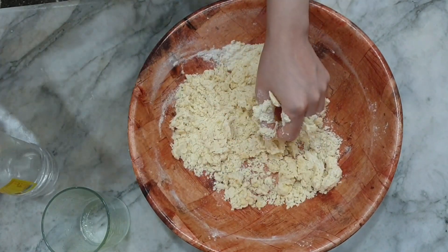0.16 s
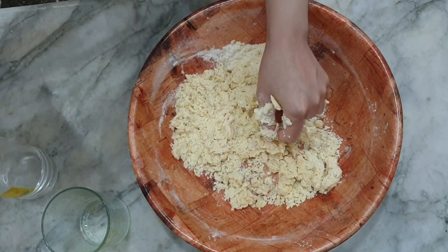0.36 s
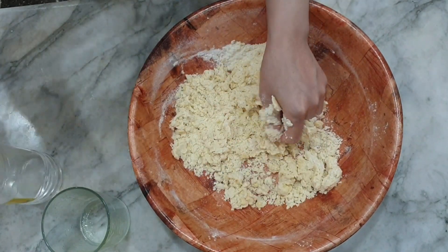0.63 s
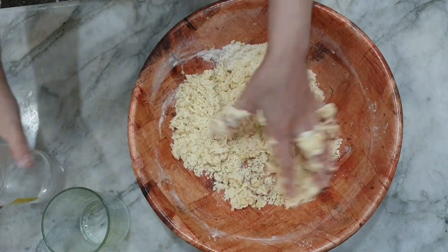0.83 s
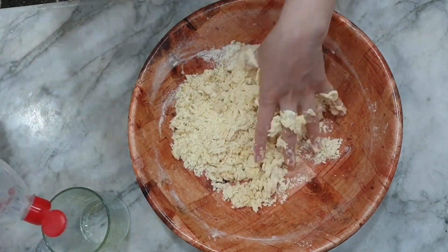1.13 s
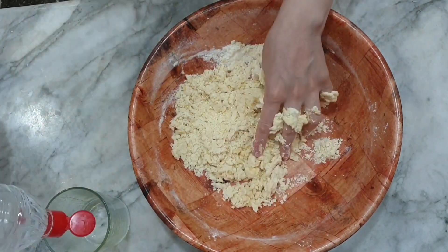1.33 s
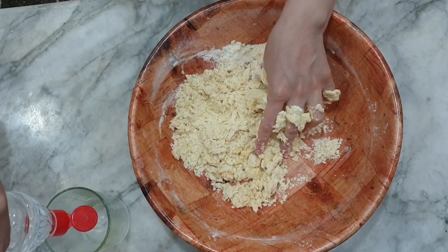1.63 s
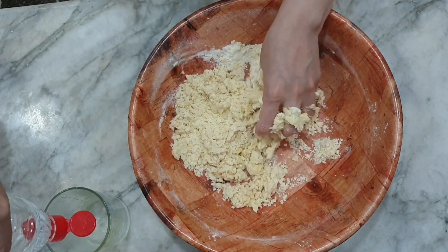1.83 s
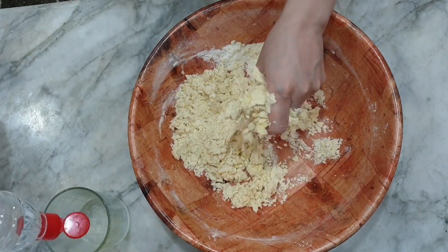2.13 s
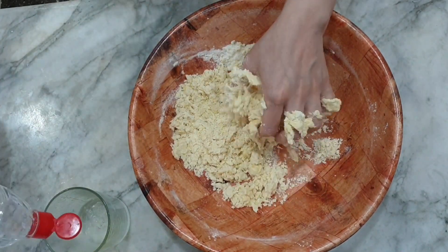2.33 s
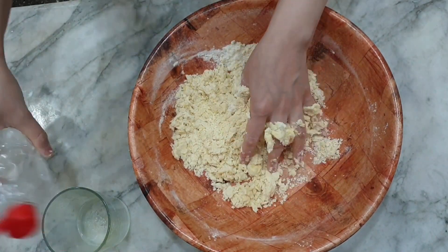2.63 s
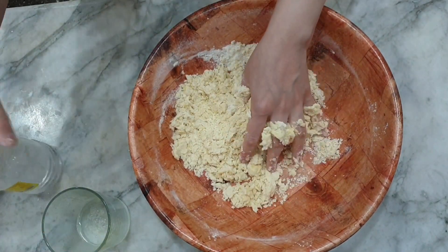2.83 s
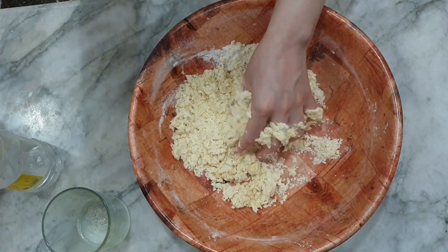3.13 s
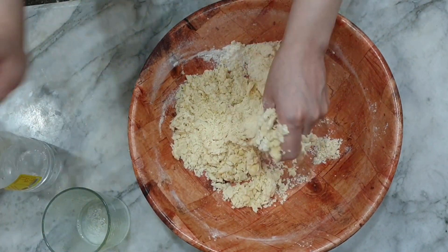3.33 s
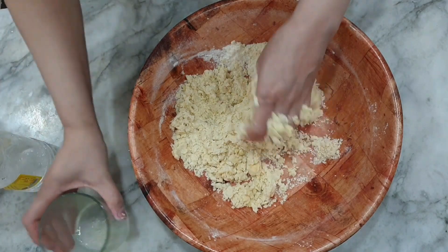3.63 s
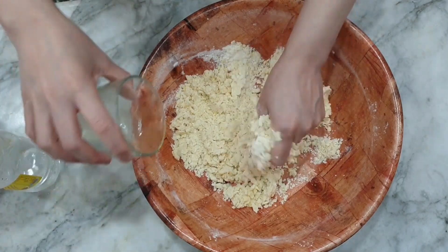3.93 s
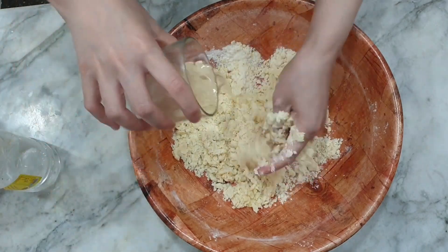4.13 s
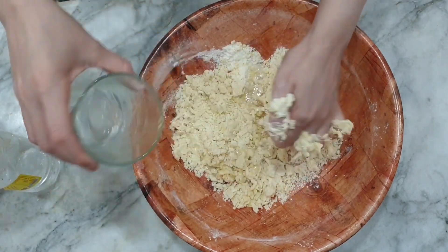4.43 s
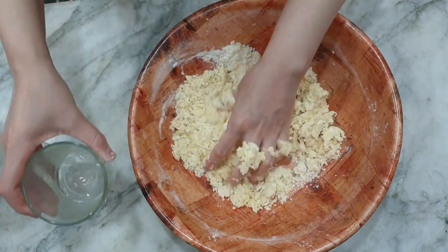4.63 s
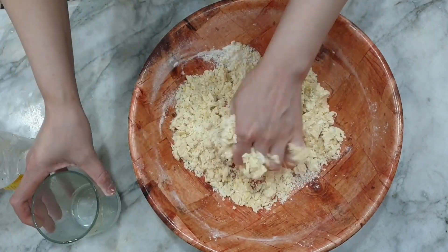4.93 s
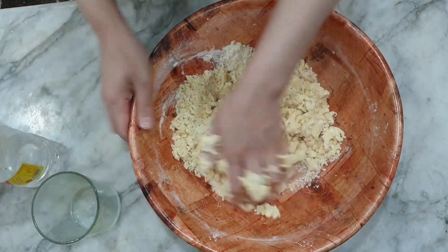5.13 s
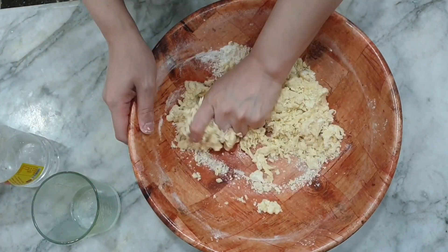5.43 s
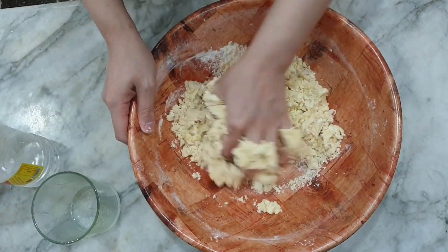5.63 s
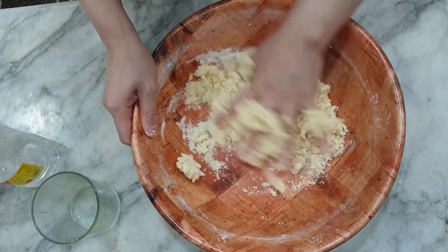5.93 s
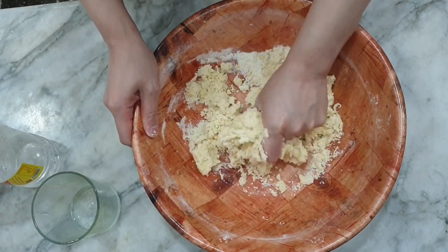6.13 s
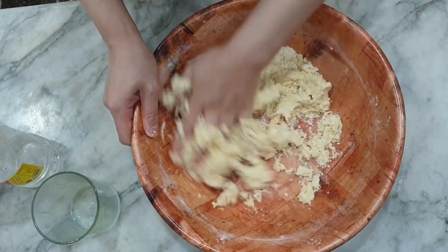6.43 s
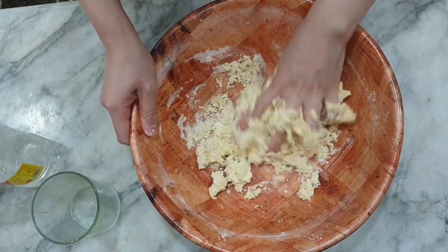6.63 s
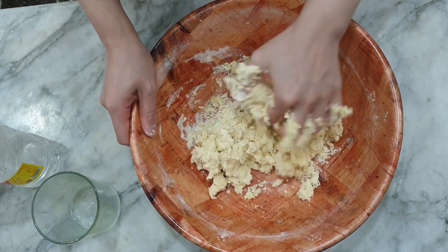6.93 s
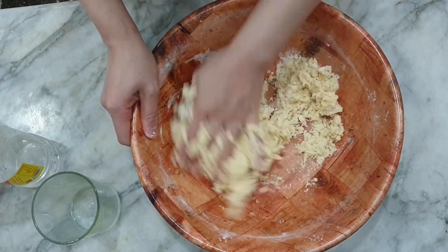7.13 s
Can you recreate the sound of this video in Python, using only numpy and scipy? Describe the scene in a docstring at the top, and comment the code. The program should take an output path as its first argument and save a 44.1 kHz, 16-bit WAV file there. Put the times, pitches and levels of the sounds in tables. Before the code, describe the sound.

Soft, gritty rustling of dough being mixed by hand, with hollow bowl knocks, a bottle cap clicking twice and a brief oil gurgle.

```python
"""Working crumbly dough in a bowl

Crumbs and skin rub a wide bowl on a stone counter; finger knocks ring its modes. A plastic bottle cap
snaps twice, oil gurgles in the neck, and the bottle's base judders on the stone. Liquid, bottle and glass
give short ringing notes and tiny high ticks. A hard kitchen rings after each blow, over a low rumble.
Heard by a phone above the bowl."""
import sys
import numpy as np
from scipy import signal
from scipy.fft import rfft, irfft
from scipy.io import wavfile
from scipy.ndimage import uniform_filter1d

SR = 44100
rng = np.random.default_rng(int(sys.argv[2]) if len(sys.argv) > 2 else 0)


def generate_wav(sig):
    """Save sig (samples, or channels by samples) to the path in sys.argv[1] as 16-bit PCM at SR."""
    pcm = np.round(np.clip(np.atleast_2d(sig).T, -1, 1) * 32767).astype(np.int16)
    wavfile.write(sys.argv[1], SR, pcm)


N = 320607
T = np.arange(N) / SR

# hand, dough and bottle strokes: (time [s], hold [s], scrape [dB], rustle re scrape [dB],
# bowl pressure re scrape [dB])
STROKES = [(-0.01, 0.25, -82, -14, -9), (0.528, 0.02, -56, -34, 7.5), (0.642, 0.03, -62.5, -23, -4),
           (0.709, 0.037, -67, -17, 8), (0.832, 0.068, -65.5, -1, 5.5), (0.975, 0.077, -70.5, 1, 6),
           (1.135, 0.093, -66, 0, 7), (1.266, 0.032, -65, -3.5, 10), (1.616, 0.089, -95, 15.5, 27),
           (1.765, 0.42, -65.5, -0.5, -19), (2.353, 0.0087, -68.5, -6, -16), (2.398, 0.013, -67, -8, -22),
           (2.55, 0.078, -76, -3.5, 16), (2.871, 0.02, -63, -12.5, 16), (3.129, 0.0064, -57, -10, 0),
           (3.328, 0.35, -88, -8, 22), (3.742, 0.017, -76, -7.5, 13), (3.77, 0.075, -66.5, 5.5, 4),
           (4.096, 0.16, -85, -1.5, 20), (4.225, 0.22, -89, 4, 21), (4.649, 0.052, -65, -1, 10.5),
           (4.692, 0.02, -59, -0.5, 0), (4.753, 0.0013, -52, 0.5, 2.5), (4.926, 0.045, -73.5, -1, 8),
           (5.043, 0.21, -83, 5.5, 19.5), (5.145, 0.062, -69, 5, -5), (5.192, 0.01, -49, -3, -7.5),
           (5.232, 0.21, -65.5, -2.5, -2), (5.504, 0.26, -86.5, 5.5, 14), (5.666, 0.075, -66.5, -3, 5),
           (5.796, 0.14, -62, 3, 1.5), (5.969, 0.088, -60, -1.5, 7), (6.23, 0.043, -70, -11.5, 7.5),
           (6.324, 0.13, -72.5, -0.5, 7.5), (6.417, 0.23, -61.5, -0.5, -2.5), (6.682, 0.039, -55, -8, -4),
           (6.843, 0.12, -86, -1.5, 9.5), (7.081, 0.57, -63.5, -1, -4)]
# crumb spectrum: (frequency [Hz], gain [dB])
CRUMB_SPECTRUM = [(530, -53.5), (900, 19.5), (1220, -4), (1370, -15), (1490, -13), (2360, -9.5),
                  (4900, -5.5), (5320, -8.5), (8630, -11), (11600, -1), (14500, -2.5), (15200, -23.5)]
# knocks on bowl and counter: (time [s], ring peak [dB], tick re ring [dB], favoured ring [Hz], thud [Hz])
KNOCKS = [(0.531, -42.5, -22, 890, 209), (0.538, -41, -13, 704, 214), (0.547, -37, -9, 810, 232),
          (0.572, -46.5, -20, 704, 239), (0.649, -51, -6, 666, 113), (0.685, -49.5, -4, 465, 324),
          (0.735, -48.5, -6, 410, 191), (0.866, -39, -23, 940, 207), (1.146, -58, 9, 525, 331),
          (1.171, -39, -2, 890, 345), (1.507, -48.5, -47, 790, 113), (1.98, -44.5, -15, 550, 130),
          (2.228, -48.5, -2.5, 900, 124.2), (2.372, -50.5, -22, 410, 438.7), (2.389, -58, -10, 430, 320),
          (2.567, -47.5, -26, 580, 199), (2.622, -47.5, -27, 396, 348), (3.134, -30, -4, 603, 160),
          (3.137, -31.5, -6.5, 221, 157.5), (3.32, -51.5, -18, 502, 204.6), (3.352, -48, -17, 459, 139),
          (3.639, -51, -33.5, 694, 121), (3.768, -48.5, -27, 830, 161), (3.782, -46.5, -15, 503, 200),
          (4.653, -53, -9, 500, 140), (4.734, -46.5, -10, 437, 314), (4.758, -36.5, 4, 1440, 145),
          (4.765, -52.5, 20, 1010, 287), (4.774, -44.5, -6, 695, 308), (4.955, -38.5, -10.5, 970, 187),
          (5.025, -45, -15, 866, 191), (5.198, -42, 7, 685, 119), (5.686, -50.5, 8.5, 860, 126),
          (5.728, -41, -7, 620, 230), (5.746, -46, -19, 640, 139), (5.982, -41, -10, 750, 310),
          (5.9875, -29, -4, 660, 301), (5.995, -39, 4, 646, 280), (6.262, -45.5, -16, 710, 131),
          (6.394, -47.5, -4, 423, 230), (6.632, -51, -20, 435, 332), (6.644, -47, -22, 506, 320),
          (6.652, -60, -22, 450, 345), (6.896, -53, -15, 580, 152), (7.083, -36, 0, 1270, 316),
          (7.088, -38, -14, 396, 298), (7.129, -49, -16, 392, 214)]
# bowl, hollow bottle and hinged lid modes: (frequency [Hz], gain [dB], t60 [s])
BOWL_MODES = [(199, 2.5, 0.092), (328, -1, 0.081), (423, -5.5, 0.062), (526, -3, 0.049), (625, -4.5, 0.069),
              (706, -8, 0.058), (820, -2.5, 0.026), (946, -4, 0.026), (1195, -1.5, 0.0093),
              (1480, -3, 0.019), (1875, 8.5, 0.0053), (2580, -2.5, 0.025)]
BOTTLE_MODES = [(161, 7, 0.029), (315, -8.5, 0.12), (418, 0, 0.038), (598, -7, 0.14), (604, 4.5, 0.057),
                (727, 4, 0.034), (765, -7.5, 0.032), (1052, -3.5, 0.045)]
LID_MODES = [(1582, 2.5, 0.054), (2563, 3.5, 0.04), (3763, 3, 0.027)]
# cap snaps: (time [s], crack peak [dB], bottle re crack [dB], treble tilt [dB/oct], left - right [dB])
SNAPS = [(1.732, -18, -8, -1, 12), (2.6822, -23.5, -20.5, -1, -18)]
# plastic crack spectrum: (frequency [Hz], gain [dB])
CRACK_SPECTRUM = [(290, -46), (500, 0), (1530, 4.5), (2800, 0.5), (3620, -6), (5190, -3), (11400, -3.5),
                  (14400, -13.5), (15400, -68.5)]
# bottle base on stone: (time [s], length [s], slip rate [Hz], level [dB])
JUDDERS = [(2.817, 0.028, 205, -41), (2.87, 0.056, 207, -38.5)]
# oil in the bottle neck: (time [s], bubble rate [1/s], base level [dB])
GURGLE = [(1.861, 222, -55), (2.151, 240, -57), (2.236, 150, -60), (2.27, 45, -72)]
# notes and ticks of liquid, bottle and glass: (time [s], length [s], pitch [Hz], level [dB])
NOTES_AND_TICKS = [(1.95, 0.06, 2640, -55), (1.989, 0.002, 10500, -56), (2.087, 0.043, 921, -53),
                   (2.106, 0.0006, 12800, -42), (2.133, 0.002, 9300, -54), (2.155, 0.024, 4320, -64),
                   (2.167, 0.001, 13800, -54), (2.18, 0.001, 6000, -58), (2.196, 0.011, 914, -52.5),
                   (2.197, 0.0094, 1137, -49), (2.198, 0.012, 1460, -51), (2.22, 0.011, 903, -52.5),
                   (2.36, 0.026, 2900, -62), (2.413, 0.0057, 2597, -51), (2.447, 0.032, 1830, -63),
                   (3.97, 0.05, 1493, -71), (4.35, 0.003, 8000, -67), (4.359, .06, 1666, -69),
                   (4.386, 0.0005, 4200, -65), (4.387, 0.0004, 6200, -70)]
# household rumble: (time [s], level near 65 Hz [dB], level near 120 Hz [dB])
RUMBLE = [(0, -67, -71.5), (.65, -63, -58), (1.36, -60, -66.5), (1.9, -65, -67.5), (2.5, -68, -64.5),
          (2.9, -65, -56), (3.352, -72.5, -65), (3.999, -60.5, -67), (4.248, -68.5, -68.5),
          (5.28, -59.5, -61), (5.67, -67.5, -63.5), (6.3, -56, -61.5), (6.6, -64.5, -61.5),
          (6.85, -50, -61.5), (7.27, -60.5, -61.5)]
# household air spectrum: (frequency [Hz], gain [dB])
AIR_SPECTRUM = [(13, -38.5), (22, -1), (59, -7), (96, -9), (130, -2.5), (153, -28.5), (206, -11),
                (397, -22), (431, -25), (468, -21), (1690, -40.5), (2100, -50), (3000, -51), (5000, -57.5),
                (8000, -63), (15000, -54.5)]
# faint mid hiss: (time [s], level [dB])
HISS = [(0, -83), (1.3, -93.5), (1.9, -68), (2.4, -81), (2.9, -73.5), (4.8, -72.5), (7.27, -76.5)]
# kitchen decay: (frequency [Hz], t60 [s])
KITCHEN_DECAY = [(150, 0.36), (500, 0.21), (1500, 0.31), (4000, 0.31), (9000, 0.099), (14000, 0.36)]
# microphone port imbalance: (frequency [Hz], left - right [dB])
PORT_BALANCE = [(60, 2), (400, -1), (1300, -3), (2500, -3.5), (5000, -8), (12000, -7)]

FADES_S = (0.25, 0.29, 0.31)  # rustle, scrape, bowl pressure
RISE_S, RISE_AT_DB, RISE_HALVING_DB = 0.017, -65.5, 20.5  # stronger strokes swell faster
MIDDLE_HZ, THUD_DB, THUD_LOSS_DB_PER_OCT = 430, 1.5, 7  # mid-bowl: low, heavy; rim: high, little thud
TICK_TOP_HZ, TICK_DB_PER_OCT = 5700, 13  # harder contacts tick brighter
KNOCK_PAN_DB, LID_DB, AIR_DB = 6.5, -14, -62
FLURRY_DELAYS_S, FLURRY_GAIN = (0.00018, 0.0005, 0.00089), 0.47
JUDDER_EDGE_S, JUDDER_DB_PER_OCT, JUDDER_WAVER = 0.0045, -15, 0.03
SPRAY_SHARE, SPRAY_LO_HZ, SPRAY_HI_HZ, SPRAY_DB = 0.3, 4180, 13500, -7.5
BOWL_LAG_S, BOTTLE_LAG_S = 0.0001, -0.00021  # bowl sounds reach the left port later, bottle sounds the right
BOTTOM_HZ, TOP_HZ = 40, 14900


def rubbing():
    """Crumbs slip as tiny clicks, unrelated at the two ports; coarse slips shake the bowl's modes."""
    db, fine_db, press_db = np.transpose(STROKES)[2:]
    rustle, scrape, press = map(stroke_envelope, (db + fine_db, db, db + press_db), FADES_S)
    slips = rng.standard_normal((3, N)) * undb(1.5 * rng.exponential(size=(3, N)))
    crumbs = colour(slips[:2], CRUMB_SPECTRUM) * undb(1.3 * walk(40))  # the grip stutters
    fine = unit(colour(band(crumbs, 5400, 18000), [(7000, 13.3), (13000, 2.3)])) * undb(0.38 * walk(41))
    coarse = unit(band(crumbs, 1450, 2417, order=3)) * undb(0.84 * walk(30))
    lumps = undb(-4.5) * unit(band(slips[:2], 720, 1500))
    between = 1.04 * np.sqrt(rustle * scrape) * unit(band(crumbs, 2795, 4210, order=3))
    bowl = unit(band(ring(slips[2] * undb(3.2 * walk(40)), BOWL_MODES), 250, 1400))
    friction = rustle * fine + between + scrape * (coarse + lumps)
    return np.sqrt(2) * friction + ports(press * bowl, BOWL_LAG_S)


def stroke_envelope(levels_db, fade_s):
    """Each stroke rises, holds and fades; overlaps add in power."""
    power = 0
    for (start_s, hold_s, force_db, *_), db in zip(STROKES, levels_db):
        rise_s = RISE_S * 2 ** ((RISE_AT_DB - force_db) / RISE_HALVING_DB)
        full_s = start_s + rise_s
        corners_s = [start_s - rise_s, full_s, full_s + hold_s, full_s + hold_s + fade_s]
        shape_db = np.interp(T, corners_s, [-33, -2, -4, -62.5], left=-200, right=-200)
        power += undb(db + shape_db) ** 2
    return np.sqrt(power)


def knocks():
    """A push with small bounces rings the bowl; nails add a tick, the blow's weight a dull thud."""
    out, t = np.zeros((2, N)), T[:int(0.25 * SR)]
    pans_db = KNOCK_PAN_DB * rng.standard_normal(len(KNOCKS))
    for (start_s, db, tick_db, spot_hz, thud_hz), pan_db in zip(KNOCKS, pans_db):
        noise = rng.standard_normal((2, len(t)))
        push = 5.74 * (t == 0) + noise[0] * np.exp(-t / 0.0066)
        click = 6 * (t == 0) + noise[1] * np.exp(-t / 0.0025)
        # each spot favours the modes near one pitch
        modes = [(hz, gain_db - 8.5 * abs(np.log2(hz / spot_hz)), t60_s)
                 for hz, gain_db, t60_s in BOWL_MODES]
        body = ring(band(push, 120, 2.77 * spot_hz), modes)
        tick_top_hz = max(TICK_TOP_HZ * 2 ** (tick_db / TICK_DB_PER_OCT), 3000)
        tick = band(band(click, 900, 4500, order=1), 1200, tick_top_hz)
        thud_db = THUD_DB - THUD_LOSS_DB_PER_OCT * np.log2(spot_hz / MIDDLE_HZ)
        thud = np.sin(2 * np.pi * thud_hz * t) * np.exp(-t * thud_hz / 1.42) * (1 - np.exp(-t / 0.0026))
        contact = peak(body, db) + peak(tick, db + tick_db)
        add(out, start_s, ports(contact, BOWL_LAG_S, pan_db) + peak(thud, db + thud_db))
    return out


def cap_snaps():
    """A sharp plastic crack; lid and hollow bottle ring under it."""
    out, t = np.zeros((2, N)), T[:int(0.4 * SR)]
    blow = signal.unit_impulse(len(t), 30)
    release = flurry(blow)
    for start_s, db, bottle_db, tilt_db_per_oct, pan_db in SNAPS:
        spectrum = [(hz, gain_db + tilt_db_per_oct * max(np.log2(hz / 1500), 0))
                    for hz, gain_db in CRACK_SPECTRUM]
        crack = peak(colour(release, spectrum) * (t < 0.2), db)
        bottle = peak(ring(blow, BOTTLE_MODES), db + bottle_db)
        lid = peak(ring(release, LID_MODES), db + LID_DB)
        add(out, start_s, ports(crack + bottle + lid, BOTTLE_LAG_S, pan_db))
    return out


def flurry(x):
    """The catch lets go: all-pass echoes spread a click over a few milliseconds."""
    for delay_s in FLURRY_DELAYS_S:
        feedback = np.r_[1, np.zeros(int(delay_s * SR)), -FLURRY_GAIN]
        x = signal.lfilter(feedback[::-1], feedback, x)
    return x


def bottle_judders():
    """The base sticks and slips at a nearly even rate: a low buzz with a few overtones."""
    out = np.zeros((2, N))
    for start_s, length_s, hz, db in JUDDERS:
        t = T[:int(2 * length_s * SR)]
        shape = np.minimum(t / JUDDER_EDGE_S, 1) * np.exp(-np.maximum(t - length_s, 0) / JUDDER_EDGE_S)
        rate_waver, level_waver = unit(band(rng.standard_normal((2, len(t))), 12, 90, order=1))
        phase = 2 * np.pi * np.cumsum(hz * (1 + JUDDER_WAVER * rate_waver)) / SR
        buzz = sum(undb(JUDDER_DB_PER_OCT * np.log2(k)) * np.sin(k * phase) for k in range(1, 7))
        add(out, start_s, ports(undb(db + 2.75 * level_waver) * shape * buzz, BOTTLE_LAG_S))
    return out


def oil_gurgle():
    """Bubbles ring at random moments, gliding upward; the smallest burst as a spray of high ticks."""
    out, t = np.zeros((2, N)), T[:int(0.04 * SR)]
    times_s, rates_hz, levels_db = np.transpose(GURGLE)
    now_s = times_s[0]
    for wait, pitch, size, kind in rng.random((200, 4)):
        now_s -= np.log(1 - wait) / np.interp(now_s, times_s, rates_hz)
        if now_s < times_s[-1]:
            is_spray = kind < SPRAY_SHARE
            hz = SPRAY_LO_HZ * (SPRAY_HI_HZ / SPRAY_LO_HZ) ** pitch if is_spray else 850 * 3.8 ** pitch
            bubble = np.sin(2 * np.pi * hz * t * (1 + 3 * t)) * np.exp(-t * hz / 7)
            db = np.interp(now_s, times_s, levels_db) + is_spray * SPRAY_DB - 3.23 * np.log(1 - size)
            add(out, now_s, ports(bubble * undb(db), BOTTLE_LAG_S))
    return out


def notes_and_ticks():
    """Short ringing notes and tiny high ticks from liquid, bottle and glass."""
    out = np.zeros((2, N))
    for start_s, length_s, hz, db in NOTES_AND_TICKS:
        t = T[:int((length_s + 0.02) * SR)]
        shape = np.minimum(t * hz / 3, 1) * np.exp(-np.maximum(t - length_s, 0) * hz / 3.3)
        rough = 1 + 0.26 * unit(band(rng.standard_normal(len(t)), 0.025 * hz, 0.058 * hz, order=1))
        add(out, start_s, ports(undb(db) * shape * rough * np.sin(2 * np.pi * hz * t), BOTTLE_LAG_S))
    return out


def kitchen(x, wet_db):
    """Hard walls: a noise tail per port, decaying band by band; the bass is weak and alike in both."""
    t = T[:int(0.7 * SR)]
    decay_hz, decay_s = np.transpose(KITCHEN_DECAY)
    tail = 0
    for hz in 128 * np.sqrt(2) ** np.arange(15):
        mid, side = band(rng.standard_normal((2, len(t))), hz / 2 ** 0.25, hz * 2 ** 0.25, order=1)
        pair = mid + min(hz / 900, 1) * np.array([side, -side])
        t60_s = np.interp(np.log(hz), np.log(decay_hz), decay_s)
        tail += min(hz / 500, 1) * pair * undb(-60 * t / t60_s)
    tail = tail * (1 - np.exp(-t / 0.00033)) / np.sqrt(np.sum(tail ** 2) / 2)
    return undb(wet_db) * signal.fftconvolve(x.mean(axis=0)[None], tail, axes=1)[:, :N]


def house_rumble():
    """Rumble alike in both ports, flickering band by band, with a faint wider hiss above."""
    times_s, low_db, upper_db = np.transpose(RUMBLE)
    mid, side = rng.standard_normal((2, N))
    wide = band(side, 750, 16000, order=1) + 0.072 * side
    air = unit(colour(mid + np.array([wide, -wide]), AIR_SPECTRUM)) * undb(AIR_DB + walk(3.2))
    low = unit(band(rng.standard_normal(N), 55, 75))
    low *= undb(np.interp(T, times_s, low_db) + 0.5 * walk(2.9))
    upper = unit(band(rng.standard_normal(N), 100, 145))
    upper *= undb(np.interp(T, times_s, upper_db) + 1.2 * walk(14))
    hiss = unit(band(rng.standard_normal((2, N)), 1217, 1950, order=3))
    hiss += unit(band(rng.standard_normal((2, N)), 2300, 4500)) * undb(-16.5 + 2.5 * walk(9))
    hiss *= undb(np.interp(T, *np.transpose(HISS)) + 1.4 * walk(23))
    return air + low + upper + hiss


def undb(db):
    return 10 ** (np.asarray(db) / 20)


def unit(x):
    return x / np.sqrt(np.mean(x ** 2))


def peak(x, db):
    return x * undb(db) / np.abs(x).max()


def colour(x, spectrum):
    """Filter by (frequency [Hz], gain [dB]) points."""
    hz, db = np.transpose(spectrum)
    bins_hz = np.maximum(np.fft.rfftfreq(x.shape[-1], 1 / SR), 1)
    return irfft(rfft(x) * undb(np.interp(np.log(bins_hz), np.log(hz), db)), x.shape[-1])


def band(x, lo_hz, hi_hz, order=2):
    sos = signal.butter(order, [lo_hz, min(hi_hz, 0.45 * SR)], "band", fs=SR, output="sos")
    return signal.sosfilt(sos, x)


def ring(x, modes):
    """Decaying modes struck by x, summed with alternating sign."""
    out = 0
    for k, (hz, db, t60_s) in enumerate(modes):
        r, w = np.exp(-np.log(1000) / (t60_s * SR)), 2 * np.pi * hz / SR
        mode = signal.lfilter([0, r * np.sin(w)], [1, -2 * r * np.cos(w), r * r], x)
        out += (-1) ** k * undb(db) * mode
    return out


def walk(rate_hz):
    """Random steps, smoothed twice; unit RMS."""
    hold = int(SR / rate_hz)
    steps = np.repeat(rng.standard_normal(N // hold + 1), hold)
    return unit(uniform_filter1d(uniform_filter1d(steps, hold), hold)[:N])


def ports(x, lag_s, pan_db=0):
    """Two microphone ports: the left is lag_s later and pan_db louder."""
    lag = round(abs(lag_s) * SR)
    late = np.r_[np.zeros(lag), x[:len(x) - lag]]
    pair = (late, x) if lag_s > 0 else (x, late)
    return np.array(pair) * undb([[pan_db / 2], [-pan_db / 2]])


def add(out, start_s, sound):
    start = int(start_s * SR)
    n = min(sound.shape[-1], N - start)
    out[:, start:start + n] += sound[:, :n]


def scene():
    """Rubbing and rumble stay dry; the short sounds ring the kitchen."""
    sends = ((knocks() + bottle_judders(), -3), (notes_and_ticks() + oil_gurgle(), -5), (cap_snaps(), 8))
    return rubbing() + house_rumble() + sum(x + kitchen(x, wet_db) for x, wet_db in sends)


def record(dry):
    """The right port faces the bowl and hears more treble; the phone cuts deep bass and the very top."""
    pair = [colour(x, [(hz, sign * db / 2) for hz, db in PORT_BALANCE]) for x, sign in zip(dry, (1, -1))]
    highpassed = signal.sosfilt(signal.butter(2, BOTTOM_HZ, "high", fs=SR, output="sos"), np.array(pair))
    return signal.sosfilt(signal.ellip(10, 0.2, 80, TOP_HZ, fs=SR, output="sos"), highpassed)


dry = scene()
out = record(dry)
generate_wav(out)
```